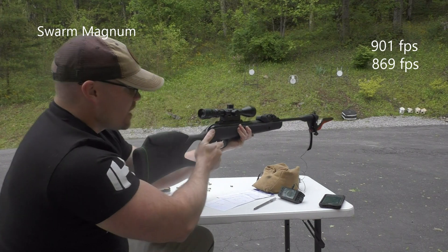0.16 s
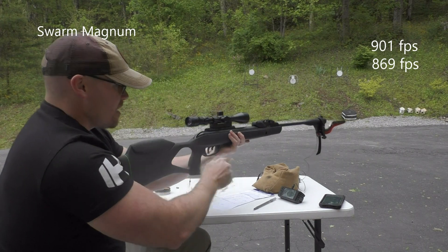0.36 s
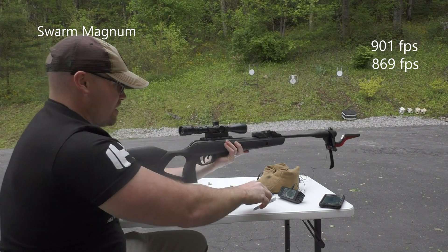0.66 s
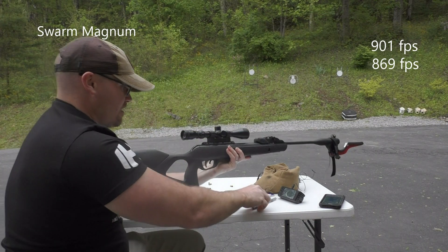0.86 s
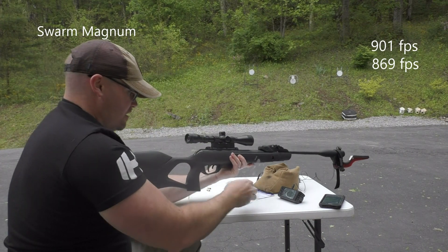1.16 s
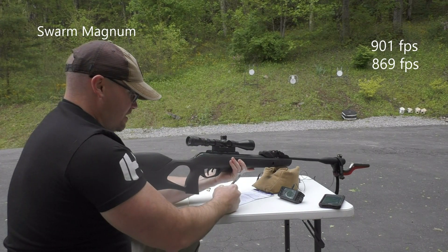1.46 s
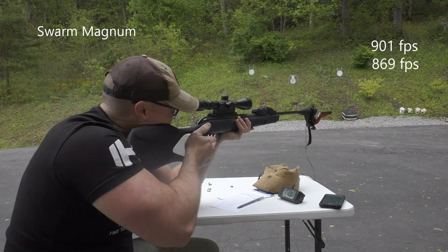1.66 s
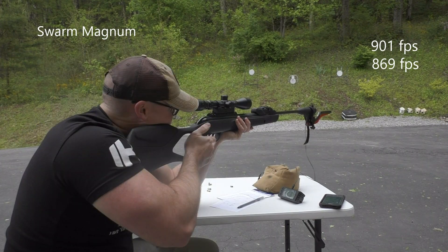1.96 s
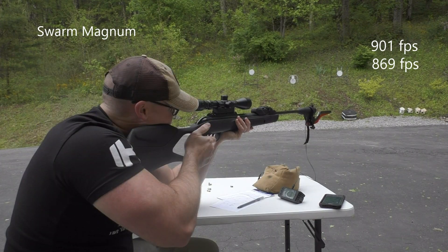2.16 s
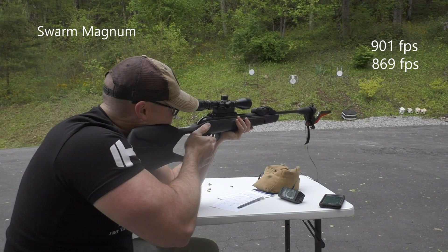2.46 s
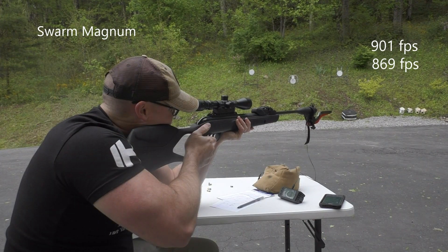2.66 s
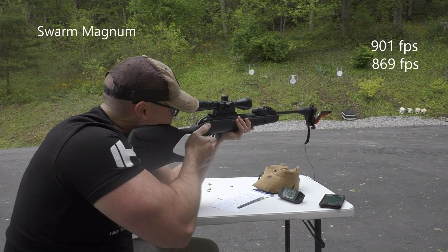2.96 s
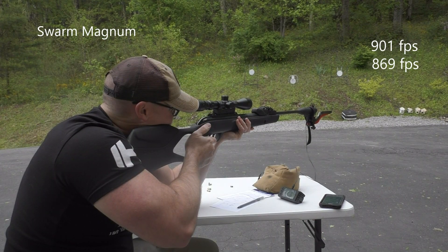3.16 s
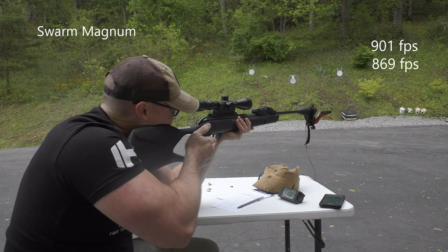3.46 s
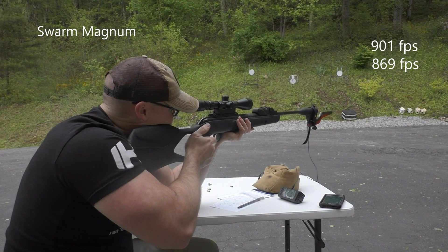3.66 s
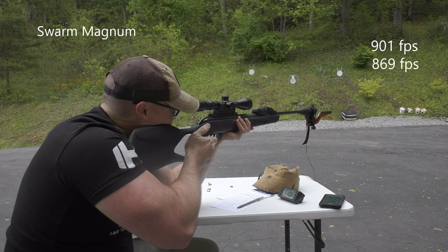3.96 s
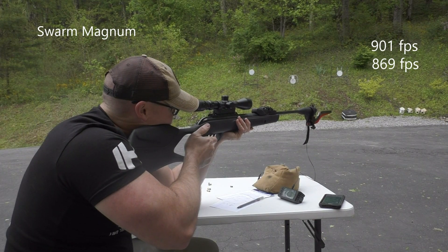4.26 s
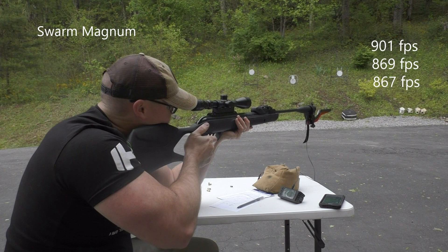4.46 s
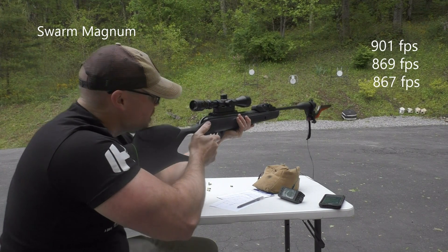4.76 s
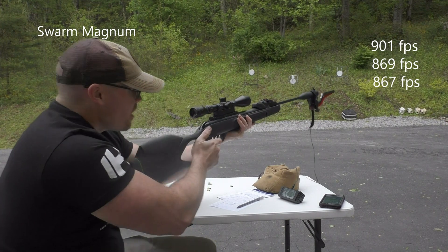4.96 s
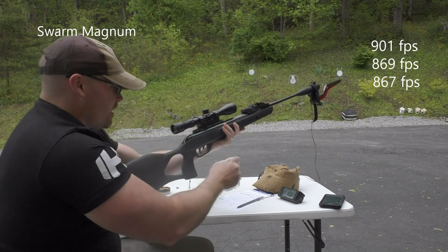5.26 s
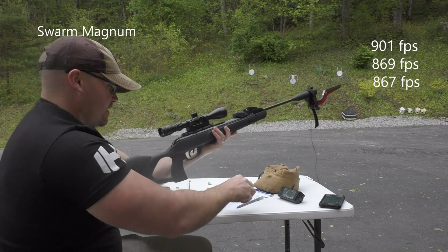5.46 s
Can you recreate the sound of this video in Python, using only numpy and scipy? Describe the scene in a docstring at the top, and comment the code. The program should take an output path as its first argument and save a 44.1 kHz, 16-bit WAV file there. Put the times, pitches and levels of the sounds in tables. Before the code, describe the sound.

Outdoors, close to the microphone, a pen taps a plastic table in a quick cluster while a sleeve rubs softly. The sound then cuts abruptly to low, fluttering wind buffeting the microphone. A single air rifle shot snaps with a metallic, springy edge, followed by a slap echo and a scattered wash from a wooded slope. Nearly a second later a distant steel plate rings faintly under the continuing gusts.

```python
"""A piston air rifle fires one round on an outdoor range: a quick train of noise cracks with ringing metal modes.
First, a pen taps a plastic table close to the microphone; then time jumps to the aimed shot.
A slap echo and a scattering wooded slope return the shot; a far steel plate rings as fluttering partials.
From the jump on, wind noise and pressure pulses buffet the microphone; a faint coloured hiss lies under everything."""
import sys
import numpy as np
from scipy import signal
from scipy.fft import rfft, irfft
from scipy.io import wavfile
from scipy.ndimage import uniform_filter1d

SR = 44100
rng = np.random.default_rng(int(sys.argv[2]) if len(sys.argv) > 2 else 0)


def to_wav(sig):
    """Store sig (one row per channel, or 1-D mono) as 16-bit WAV at the path in sys.argv[1].

    Samples outside -1..1 are clipped; the rate is SR.
    """
    pcm = np.clip(np.atleast_2d(sig), -1, 1) * 32767
    pcm = np.round(pcm).astype(np.int16)
    wavfile.write(sys.argv[1], SR, pcm.T)  # frames by channels


N = 247401
T = np.arange(N) / SR
CUT_S = 1.68  # time jumps from the table work to the aimed shot


def undb(db):
    """Decibels to gain."""
    return 10 ** (np.asarray(db) / 20)


def unit(x):
    """Scale to rms 1."""
    return x / np.sqrt(np.mean(x ** 2))


def add(out, s, x):
    """Mix x in from time s."""
    i = max(int(s * SR), 0)
    out[i:i + len(x)] += x[:N - i]


def convolve(x, response):
    """Pass x through an impulse response."""
    return signal.fftconvolve(x, response)[:N]


def colour(x, points, size=4096):
    """Causal filter of unit power through (Hz, dB) points, falling away below the lowest."""
    hz, db = np.transpose(points)
    f = np.maximum(np.arange(size // 2 + 1), 1) * SR / size
    gain = undb(np.interp(np.log(f), np.log(hz), db)) * np.minimum(f / hz[0], 1)
    # folding the cepstrum gives minimum phase
    cepstrum = irfft(np.log(unit(gain)))
    cepstrum[1:size // 2] *= 2
    cepstrum[size // 2 + 1:] = 0
    return convolve(x, irfft(np.exp(rfft(cepstrum))))


def split(x, hz):
    """The parts of x below and above hz."""
    low = signal.sosfiltfilt(signal.butter(2, hz, fs=SR, output="sos"), x)
    return low, x - low


def noise(points):
    """Coloured noise of rms 1."""
    return unit(colour(rng.standard_normal(N), points))


def walk(rate):
    """Slow random wander with a spread near 1; rate is new values per second."""
    k = int(SR / rate)
    steps = np.repeat(rng.standard_normal(N // k + 1), k)
    return 1.3 * uniform_filter1d(uniform_filter1d(steps, k), k)[:N]


def burst(s, hold, decay, rise=0.00015):
    """Envelope of a contact: quick rise, short hold, exponential fall; all times in seconds."""
    t = T[:SR // 4]
    out = np.zeros(N)
    add(out, s, np.minimum(t / rise, 1) * np.exp(-np.maximum(t - hold, 0) / decay))
    return out


def ring(modes, size=16384, spread_db=1.64):
    """One blow on a set of modes; their strengths and phases depend on where it lands."""
    t = T[:size]
    total = 0
    for hz, db, t60 in modes:
        level = undb(db + spread_db * rng.standard_normal() - 60 * t / t60)
        total = total + level * np.sin(2 * np.pi * (hz * t + rng.random()))
    return total * np.minimum(t / 0.0016, 1)


def pressure_pulse(s, width):
    """A smooth push of air, peak 1, with a shallow dip either side."""
    t = (T[:4096] - T[2048]) / width
    out = np.zeros(N)
    add(out, s - T[2048], 1.5 * np.exp(-t ** 2 / 2) - .5 * np.exp(-t ** 2 / 18))
    return out


# Air around the table. Each row: frequency in Hz, relative level in dB.
TABLE_AIR = [(15, -67), (25, -18), (130, 5), (344, -6), (503, -39), (607, -43), (988, -30), (1260, -53),
             (1790, -13.5), (2160, -18.5), (4030, -16), (5570, -22.5), (6050, -27), (9570, -12.5),
             (16000, -17.5)]


def table_air(level_db=-57, waver_db=2):
    """Background at the table: a wavering low rumble under a steady hiss."""
    rumble, hiss = split(noise(TABLE_AIR), 290)
    return undb(level_db) * (rumble * undb(waver_db * walk(13.98) + 1) + hiss)


# Sleeve and arm sliding on the table. Each row: time in seconds, level in dB.
SLEEVE = [(0, -57), (.15, -64.5), (.5, -60.5), (.62, -67.5), (1.04, -60), (1.15, -68), (1.5, -73),
          (1.67, -59)]
# Tone of the sliding cloth. Each row: frequency in Hz, relative level in dB.
SLEEVE_COLOUR = [(700, -1), (1100, 8), (1700, 6.5), (2600, 8.5), (3600, -10), (5200, -0.5), (6200, -18),
                 (10000, -1), (15000, -12)]


def sleeve(waver_db=2):
    """Cloth friction: coloured noise that follows the slide, with a fine random waver."""
    s, db = np.transpose(SLEEVE)
    return noise(SLEEVE_COLOUR) * undb(np.interp(T, s, db) + waver_db * walk(39.8))


# Faint thin tones: the table's ring after the first tap, then a pen squeak. Each row: start in seconds,
# length in seconds, centre frequency in Hz, level in dB.
THIN_TONES = [(0, 0.038, 2470, -44.5), (1.033, 0.041, 2920, -48)]


def thin_tones(width_hz=110):
    """The table's ring after the first tap, then a pen squeak: swelling sines of wandering pitch."""
    out = 0
    for s, length, hz, db in THIN_TONES:
        swell = np.sin(np.pi * np.clip((T - s) / length, 0, 1))
        phase = 2 * np.pi * np.cumsum(hz + width_hz * walk(820)) / SR
        out = out + undb(db) * swell * np.sin(phase)
    return out


# Pen and hand striking the table. Each row: start in seconds, level in dB, relative treble in dB.
TAPS = [(.001, -32.5, -16.5), (0.377, -42.5, -16), (.452, -35.5, -23), (.538, -43.5, -9), (0.67, -31.5, -1),
        (0.7025, -32, -0.5), (0.7314, -30.5, -10), (0.7819, -30.5, 0), (0.8107, -31, -5),
        (0.8393, -31, -7.5), (0.8956, -30, -5), (0.9393, -29, -5.5)]
# Tone of hard plastic contacts, for taps and ticks. Each row: frequency in Hz, relative level in dB.
TAP_COLOUR = [(300, 1), (700, -38), (1300, -8), (2300, -4.5), (3400, -6), (5300, -4.5), (6200, -9),
              (7000, 1.5), (8400, -1.5), (11000, 9), (13500, -4), (16000, -8)]
# Resonances of the table top. Each row: frequency in Hz, relative level in dB, 60 dB decay in seconds.
TABLE_MODES = [(239.7, -7.5, 0.41), (317.6, -2.5, 0.11), (453, -11, 0.1), (890, -11.5, 0.092),
               (1470, 1.5, 0.074), (2010, 7.5, 0.031), (2370, 7.5, 0.039), (2438, 6, 0.07),
               (2794, 8, 0.033), (3330, -0.5, 0.041), (4090, 0, 0.044), (5480, -3.5, 0.07)]


def pen(bounce_s=0.00245, bounce_db=-2, ring_db=-14.5, rattle_db=-19):
    """Each tap lands twice in a few milliseconds, rattles the pen and rings the table top."""
    body, treble = split(noise(TAP_COLOUR), 5800)
    out = np.zeros(N)
    for s, db, treble_db in TAPS:
        landing = burst(s, 0.0011, 0.0022)
        bounce = undb(bounce_db) * burst(s + bounce_s, 0.0018, 0.0013)
        rattle = undb(rattle_db) * burst(s, 0, 0.031)
        out += undb(db) * (landing + bounce + rattle) * (body + undb(treble_db) * treble)
        add(out, s, undb(db + ring_db) * ring(TABLE_MODES))
    return out


# Small ticks of pen, grip and stock. Each row: start in seconds, level in dB, decay in seconds,
# relative body in dB.
TICKS = [(1.370, -40.5, 0.00082, -12), (1.380, -36, 0.0024, -21), (1.396, -45.5, .004, -22),
         (1.433, -47.5, .0015, -11), (1.498, -51.5, 0.0091, 8.5), (2.974, -61, 0.0043, 22.5),
         (3.200, -48, 0.0013, -21), (3.540, -43, 0.00098, -21), (3.722, -37.5, 0.014, -2),
         (5.521, -48.5, 0.014, 8)]


def ticks():
    """Light, dry clicks of hard plastic."""
    body, treble = split(noise(TAP_COLOUR), 4800)
    out = 0
    for s, db, decay, body_db in TICKS:
        out = out + undb(db) * burst(s, 0.00094, decay) * (treble + undb(body_db) * body)
    return out


def bump(s=1.468, db=-44, decay=0.025):
    """A soft, dull bump of the arm on the table: a slowly rising burst of low noise."""
    dull = noise([(130, -11), (200, 5), (260, -1), (340, -25), (500, -35), (2000, -57)])
    return undb(db) * burst(s, 0.014, decay, rise=0.0074) * dull


# Open air of the range. Each row: frequency in Hz, relative level in dB.
RANGE_AIR = [(470, -22.5), (800, -18.5), (930, -10), (1410, -9.5), (1810, -0.5), (2500, -5.5), (3140, -4),
             (4400, -5.5), (5800, -7.5), (7080, -9), (9220, 1.5), (12100, 3), (16000, -5)]


def range_air(level_db=-60, waver_db=2.0):
    """Faint outdoor hiss; its low and middle bands swell and sink on their own, the top stays steady."""
    low, rest = split(noise(RANGE_AIR), 2200)
    middle, top = split(rest, 5000)
    wavering = low * undb(waver_db * walk(32)) + middle * undb(waver_db * walk(7.2))
    return undb(level_db) * (wavering + top)


# Separate gusts at the microphone, with lulls between. Each row: start in seconds, length in seconds,
# level in dB.
GUSTS = [(1.714, 0.2, -29), (1.977, .19, -29), (2.32, 0.31, -30), (2.702, 0.029, -27.5),
         (2.817, 0.24, -28.5), (3.226, 0.16, -31), (3.46, 0.13, -32), (3.89, 0.44, -23), (4.452, .13, -26),
         (4.723, 0.2, -36.5), (5.083, 0.38, -32.5)]


def wind_strength(breeze_db=-40, attack_s=.018, release_s=0.032, sag_db_per_s=6.5):
    """Level in dB: each gust springs up, sags a little and dies back to the breeze."""
    power = undb(breeze_db) ** 2
    for s, length, db in GUSTS:
        t = T - s
        swell = np.exp(np.minimum(t, 0) / attack_s - np.maximum(t - length, 0) / release_s)
        power = power + (swell * undb(db - sag_db_per_s * np.clip(t, 0, length))) ** 2
    return 10 * np.log10(power)


def eddies(gust_db, per_s=14, above_wind_db=7.5, scatter_db=3.5, width_s=0.0012):
    """Small eddies strike the microphone at random as pressure pulses, harder in strong wind."""
    struck = rng.random(N) < per_s / SR
    peak = undb(gust_db + above_wind_db + scatter_db * rng.standard_normal(N))
    strikes = struck * rng.choice([-1, 1], N) * peak
    return signal.fftconvolve(strikes, pressure_pulse(T[2048], width_s)[:4096], mode="same")


# The hardest buffets on the microphone. Each row: time in seconds, peak in dB, width in seconds.
BUFFETS = [(1.735, -15.5, 0.0021), (2.004, -16.5, 0.0011), (2.436, -11, 0.0016), (2.553, -12.5, .0011),
           (2.566, -12, 0.0017), (2.922, -14.5, 0.0023), (3.214, -19, .001), (4.019, -8.5, .0015),
           (4.211, -13, 0.0012), (4.285, -7.5, 0.0022), (4.867, -14, 0.0016), (5.368, -10, .001)]


def buffets(spit_db=-44):
    """Single hard pushes of air either way; the steepest shed a little finer turbulence."""
    pushes = np.zeros(N)
    for s, peak_db, width in BUFFETS:
        pushes += rng.choice([-1, 1]) * undb(peak_db) * pressure_pulse(s, width)
    steepness = uniform_filter1d(np.gradient(pushes) ** 4, size=128)
    fine = noise([(400, 3.0), (1000, -6), (2200, -13.0), (5000, -51.0), (16000, -59.0)])
    return pushes + undb(spit_db) * steepness / steepness.max() * fine


# Wind rumble at the microphone. Each row: frequency in Hz, relative level in dB.
WIND_COLOUR = [(22, -1.5), (45, -3), (100, -1.5), (170, 0), (245, -7.5), (330, -23.5), (420, -49),
               (520, -53), (800, -63), (1500, -63.5)]


def wind(flutter_db=6.0, brightening=0.68, strong_db=-27, entry_db=-27, unrest_db=2, unrest_rate=22):
    """Turbulence on the microphone: a fluttering rumble, brighter in gusts, with eddies and hard buffets."""
    gust_db = wind_strength() + unrest_db * walk(unrest_rate)
    low, high = split(noise(WIND_COLOUR) * undb(flutter_db * walk(70)), 180)
    rumble = low + undb(brightening * (gust_db - strong_db) + 2 * walk(70)) * high
    # level the rumble so that gust strength sets its short-term level
    power = uniform_filter1d(uniform_filter1d(rumble ** 2, size=1500), size=1024)
    rumble = rumble / np.sqrt(power + 1e-9)
    # the rumble enters with a soft pop
    entry = undb(entry_db) * burst(CUT_S, 0, 0.0018, rise=1 / SR)
    return rumble * undb(gust_db) + eddies(gust_db) + buffets() + entry


# The firing cycle at the shooter, from sear release to piston slam and muzzle puff. Each row: start in
# seconds, level in dB, hold in seconds, decay in seconds, relative body in dB.
CRACKS = [(3.6473, -15.5, 0.0058, 0.0018, 0.5), (3.6513, -12.5, 0.00086, 0.0031, -10),
          (3.658, -12.5, 0.0026, 0.0021, 7.5), (3.663, -18, 0.00053, 0.0023, -2),
          (3.666, -10.5, 0.0027, 0.0015, 0.5), (3.669, -25, 0.00099, 0.0029, 10.5)]
# Tone of the cracks. Each row: frequency in Hz, relative level in dB.
CRACK_COLOUR = [(400, -26), (700, -18), (980, -17), (1200, 1), (1550, -5), (2500, -3.5), (5200, -8),
                (6700, 0.5), (8200, -3.5), (10300, 2.5), (13000, -3.5), (16000, -8)]
# Barrel, spring and scope. Each row: frequency in Hz, relative level in dB, 60 dB decay in seconds.
RIFLE_MODES = [(1250, -8, 0.032), (2358, 2, 0.08), (3220, -4, 0.046), (4403, -14, .06), (5250, -18, .05),
               (6730, 6, 0.088), (6460, -5, .05), (10660, -4, 0.05)]


def rifle(buzz_db=-32, buzz_decay=0.02, ring_db=-17):
    """Cracks of the firing cycle strike the metal parts; the spring buzzes on briefly."""
    body, treble = split(noise(CRACK_COLOUR), 2640)
    out = undb(buzz_db) * burst(CRACKS[-1][0], .004, buzz_decay) * (treble + undb(-4) * body)
    for s, db, hold, decay, body_db in CRACKS:
        out += undb(db) * burst(s, hold, decay, rise=0.00081) * (treble + undb(body_db) * body)
    # the parts ring from the release and again from the piston's slam
    for s, db, *_ in (CRACKS[0], CRACKS[2]):
        add(out, s, undb(db + ring_db) * ring(RIFLE_MODES))
    return out


# Recoil thumps of the stock. Each row: time in seconds, peak in dB.
THUMPS = [(3.651, -11), (3.661, -11.5), (3.670, -9.5)]


def recoil(width=0.00075):
    """The stock jerks back, forward and back as the piston runs and stops."""
    out = np.zeros(N)
    direction = -1
    for s, db in THUMPS:
        out += direction * undb(db) * pressure_pulse(s, width)
        direction = -direction
    return out


def smoothed(shot, width_hz=500):
    """The shot as the whole slope receives it: heard from many sides, its narrow peaks and dips average out."""
    power = uniform_filter1d(np.abs(rfft(shot)) ** 2, size=int(width_hz * N / SR))
    # without phase, the smoothed spectrum becomes one compact click
    click = np.fft.fftshift(irfft(np.sqrt(np.maximum(power, 0)), N))[N // 2 - 512:N // 2 + 512]
    out = np.zeros(N)
    add(out, CRACKS[2][0] - T[len(click) // 2], click)
    return out


# Echo of the wooded slope by band. Each row: frequency in Hz, relative level in dB, 60 dB decay in seconds.
WOODS = [(500, -11, 1), (1000, -23, 6.4), (1840, -10, 2.7), (2640, -15, 2.4), (3200, -4.5, 1.05),
         (3850, -7.5, 1.15), (5700, -6.5, 1.15), (5700, 2, 0.59), (6700, -20, 1.35), (8300, -1, 0.69),
         (12500, -4.5, 0.18), (16000, -14, 0.22)]


def woods(shot, edge_s=0.12, peak_s=0.27, ground_db=-12, rise_db=14):
    """Scattered echo: first from the ground, then a swell from the trees, each band dying at its own rate."""
    hz, db, t60 = np.transpose(WOODS)
    t = T[:65536]
    swell_s = [0, .03, edge_s, peak_s - .04, peak_s]
    swell_db = np.interp(t, swell_s, [ground_db - 20, ground_db, -rise_db, -1.5, 0])
    scatter = rfft(rng.standard_normal(len(t))) / np.sqrt(SR)
    log_f = np.log(np.arange(1, len(scatter) + 1) * SR / len(t))
    response = 0
    # each row of the identity picks one band, cross-faded into its neighbours
    for k, share in enumerate(np.eye(len(hz))):
        band = irfft(scatter * np.interp(log_f, np.log(hz), share))
        response = response + band * undb(db[k] + swell_db - 60 * np.maximum(t - peak_s, 0) / t60[k])
    return convolve(shot, response)


def slap(s=3.7715, db=-19):
    """The sharp muzzle crack comes back alone from a hard face down the range."""
    thin = noise([(900, -19), (1300, -18.5), (2100, -19), (2700, -3), (3200, 1.5), (3800, -6), (4400, -2.5),
                  (5000, -14), (6500, -3.5), (8500, -0.5), (10500, 7.5), (12500, -8), (16000, -8.5)])
    crack = burst(s, 0.0014, 0.0016, rise=0.00062)
    tail = undb(-6) * burst(s, 0, 0.0072)
    return undb(db) * (crack + tail) * thin


# Far hanging steel target. Each row: frequency in Hz, relative level in dB, 60 dB decay in seconds.
PLATE_MODES = [(728, -14.5, 5.1), (1032, -12.5, 7.9), (1183, -7.5, 3.8), (1350, 8, 2.83), (1410, 1.5, 1.7),
               (1497, -6, 1.5), (1810, 4.5, 1.14), (2005, -3.5, 2.8), (2080, 6, 0.36), (2290, -2, 1.2),
               (2740, -2.5, 0.87), (3120, -8, 2), (3370, -6, 1.6), (4080, -0.5, 0.69), (4400, -24, 0.91),
               (4700, -2, 0.6), (4830, -10, 2.5), (6110, -4, 0.89)]
# Ways its ring travels back, straight and off the trees. Each row: delay in seconds, gain in dB,
# relative shiver in dB.
PLATE_PATHS = [(0, -5, 4.5), (.045, -4.5, 8), (.155, -7.5, -2)]


def plate(s=4.478, db=-55, clang_db=-51.5, clang_t60=2.6, shiver_db=-56, shiver_decay=0.17, patchy_db=1.8):
    """The pellet rings a far steel plate; paths through the trees make partials flutter and smear the impact."""
    t = np.maximum(T - s, 0)
    tone = 0
    for hz, mode_db, t60 in PLATE_MODES:
        flutter_rate = 60 + hz / 35
        flutter = walk(flutter_rate) + 1j * walk(flutter_rate)  # wanders in strength and phase
        level = undb(db + mode_db + patchy_db * walk(12) - 60 * t / t60)
        tone = tone + level * np.real(flutter * np.exp(2j * np.pi * hz * t))
    clang = noise([(550, -9), (950, -8.5), (1400, -1.0), (2200, -2), (3000, -12.5), (4800, -24), (7000, -20),
                   (16000, -12.5)])
    tone = (tone + undb(clang_db - 60 * t / clang_t60) * clang) * np.minimum(t / 0.012, 1)
    # the bright edge of the impact comes back as a short, grainy wash
    shiver = noise([(1500, -30), (2600, -10), (4500, 3.0), (5600, -9), (6300, -6), (7500, -4), (9500, 0.5),
                    (13000, -8), (16000, -20)])
    grain = undb(shiver_db + 2 * walk(70))
    shiver = shiver * grain * np.minimum(t / 0.008, 1) * np.exp(-t / shiver_decay)
    out = np.zeros(N)
    for delay, path_db, bright_db in PLATE_PATHS:
        add(out, delay, undb(path_db) * (tone + undb(bright_db) * shiver))
    return out


def scene():
    """Table work before the jump in time; wind, shot and echoes after it."""
    background = np.where(T >= CUT_S, range_air() + wind(), table_air() + sleeve())
    handling = thin_tones() + pen() + ticks() + bump()
    shot = rifle()
    returns = woods(smoothed(shot)) + slap() + plate()
    return (background + handling + shot + recoil() + returns)[None]


def record(dry, top_hz=15900):
    """The recorder rounds the highest peaks and cuts the top."""
    return signal.sosfilt(signal.ellip(8, .2, 70, top_hz, fs=SR, output="sos"), np.tanh(dry))


dry = scene()
out = record(dry)
to_wav(out)
```